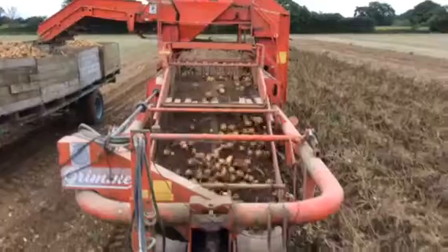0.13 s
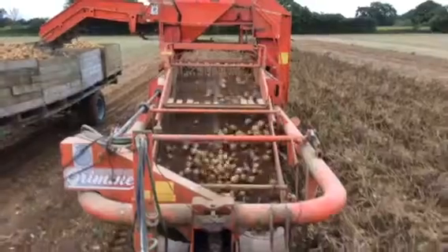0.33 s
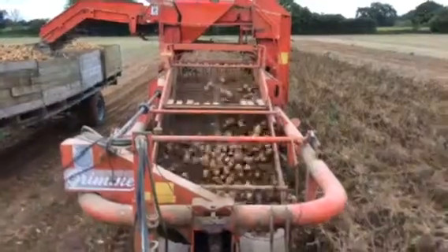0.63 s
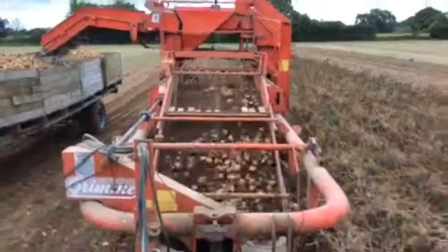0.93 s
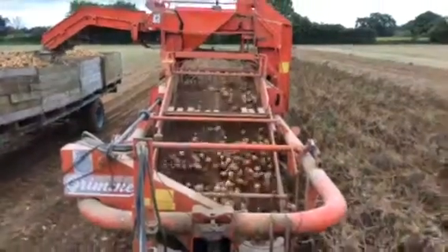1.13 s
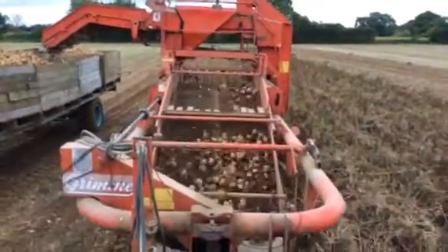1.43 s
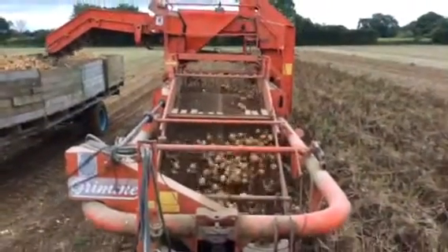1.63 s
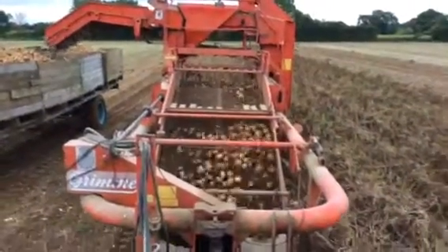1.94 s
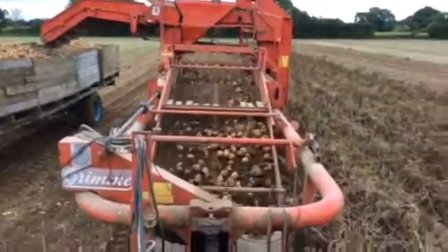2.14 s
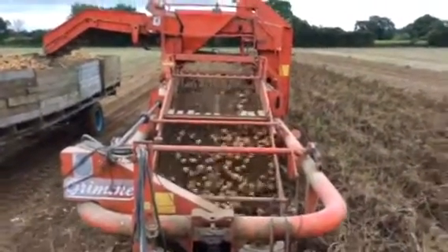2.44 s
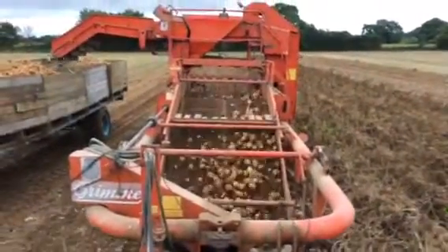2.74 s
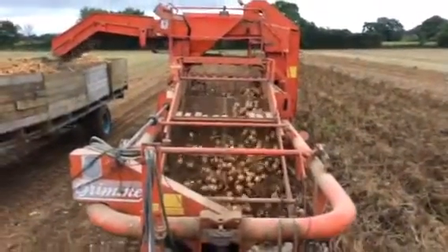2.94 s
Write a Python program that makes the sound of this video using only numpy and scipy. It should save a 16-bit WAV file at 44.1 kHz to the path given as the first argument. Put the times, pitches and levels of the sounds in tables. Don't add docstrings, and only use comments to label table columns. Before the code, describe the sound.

Potato harvester working in an open field, close and dry. Silence until 0.12 s, then full roar cuts in and continues to the end. A diesel drone near 85 Hz throbs with small load surges, strongest around 0.8 and 1.1-1.3 s, under a wavering whine near 1.5 kHz. Hissy rod rattle carries hollow potato clacks, sharp knocks, brief rubs and tiny high squeaks, busiest at 2.05-2.2 and 2.6-2.85 s.

```python
import sys
import numpy as np
from scipy import signal
from scipy.fft import rfft, irfft
from scipy.io import wavfile
from scipy.ndimage import uniform_filter1d

SR = 44100
rng = np.random.default_rng(int(sys.argv[2]) if len(sys.argv) > 2 else 0)


def gain_from_decibels(decibels):
    exponent = np.asarray(decibels, float) / 20
    return 10 ** exponent


def master(y):
    cut = np.clip(np.atleast_2d(y).T, -1, 1)
    pcm = np.round(cut * 32767)
    wavfile.write(sys.argv[1], SR, pcm.astype(np.int16))


N = 136269

# time in seconds, firing rate in Hz, firing line level in dB.
ENGINE = [
    (0, 85.5, -31),
    (.5, 85.8, -30),
    (1.1, 85.3, -31),
    (1.4, 85.6, -28),
    (1.9, 85.7, -29),
    (2.25, 86.2, -31),
    (2.6, 85.4, -29),
    (3.1, 86, -31),
]


def evened(x):
    return x / np.sqrt(np.mean(x ** 2) + 1e-20)


def curve(rows, col):
    return np.interp(np.arange(N) / SR, *np.transpose(rows)[[0, col]])


def wander(per_s):
    t = np.arange(0, N, 64) / SR
    f = np.geomspace(.3, per_s, num=24)[:, None]
    waves = np.sin(2 * np.pi * (f * t + rng.random(f.shape))) / np.sqrt(f)
    return np.interp(np.arange(N) / SR, t, evened(waves.sum(0)))


def colour(x, points):
    f, db = np.transpose(points)
    hz = np.fft.rfftfreq(len(x), 1 / SR)
    gain = gain_from_decibels(np.interp(np.log(hz + 1), np.log(f + 1), db))
    return evened(irfft(rfft(x) * gain, len(x)))


def resonate(x, hz, width_hz):
    turn = np.exp(2j * np.pi * np.cumsum(hz * np.ones(len(x))) / SR)
    r = np.exp(-np.pi * width_hz / SR)
    return 2 * (turn * signal.lfilter([1 - r], [1, -r], x / turn)).real


def resonate_twice(x, hz, width_hz):
    return resonate(resonate(x, hz, width_hz), hz, width_hz)


def short_peak(x):
    return np.sqrt(uniform_filter1d(x ** 2, size=130).max())


def add(mix, s, sound):
    part = mix[round(s * SR):][:len(sound)]
    part += sound[:len(part)]


def tone(hz, level_db, wander_db, fuzz, width_hz):
    cycles = np.cumsum(hz * np.ones(N)) / SR + rng.random()
    clean = np.sqrt(2) * np.sin(2 * np.pi * cycles)
    blur = evened(resonate_twice(rng.standard_normal(N), hz, width_hz))
    return gain_from_decibels(level_db + wander_db * wander(9.8)) * (clean + fuzz * blur)


def swells(order):
    # time in seconds, swell in dB, order as a multiple of the firing rate.
    swell_rows = [(.14, 2.5, 1), (.3, -2, 1), (.26, 2.5, 2), (.545, 6.5, 1), (.61, 5, 2), (0.809, 13.5, 2),
                  (.975, 5, 2), (1.14, 10, 3), (1.2, 6, 1), (1.23, 12, 2), (1.27, -2, 1), (1.311, 3.5, 2),
                  (1.37, 7, 2), (1.42, 2, 1), (1.48, 2, 1), (1.525, 8, 2), (1.64, 2, 1), (1.695, 2, 1),
                  (1.79, 3.5, 3), (1.9, -1, 1), (1.97, -1, 1), (2.11, 3, 1), (2.2, 6, 2), (2.48, 3, 1),
                  (2.59, 5, 1), (2.64, 6, 2), (2.72, 10, 2), (2.97, 4, 1), (3.041, 5, 3)]
    swell_s = .018
    t = np.arange(0, N, 64) / SR
    swell_db = 0 * t
    for s, db, k in swell_rows:
        if round(k) == order:
            swell_db = swell_db + db * np.exp(-.5 * ((t - s) / swell_s) ** 2)
    return np.interp(np.arange(N) / SR, t, swell_db)


def engines():
    # multiple of the firing rate, level re firing line in dB.
    exhaust_orders = [(1, -1.5), (2, -8), (3, -10.5), (6, -19.5), (1.5, -33), (.5, -26)]
    # frequency in Hz, level in dB.
    far_hums = [(68.2, -38.5), (136, -43), (272, -45), (344.1, -39.5), (363, -45), (565, -50)]
    firing_hz, firing_db = curve(ENGINE, col=1), curve(ENGINE, col=2)
    mix = np.zeros(N)
    for k, order_db in exhaust_orders:
        wander_db = 1.5 if k != 1 else .8
        mix += tone(k * firing_hz, firing_db + order_db + swells(k), wander_db, .3 * k, 5 * k)
    for hz, level_db in far_hums:
        mix += tone(hz, level_db, 1.5, min(hz / 200, .8), 22)
    return mix


def gearbox():
    # time in seconds, frequency in Hz, level in dB.
    whine = [(0, 1477, -31), (.25, 1477, -31.5), (.44, 1476, -33), (.65, 1476, -30), (1.02, 1476, -32),
             (1.12, 1475, -39), (1.22, 1474, -38), (1.28, 1474, -30), (1.55, 1475, -33),
             (1.75, 1476, -31.5), (1.93, 1476, -35), (2.0, 1474, -30), (2.28, 1473, -30.5),
             (2.4, 1473, -35), (2.55, 1475, -30), (2.66, 1475, -34), (2.75, 1475, -30.5), (3.1, 1476, -31)]
    # share of the whine pitch, level re mean whine in dB.
    side_orders = [(.802, -12), (1.203, -16), (.4955, -13.5), (.69, -14), (.893, -15), (.936, -12),
                   (.524, -13), (.852, -12)]
    # time in seconds, frequency in Hz, level in dB.
    web_drive = [(.1, 1110, -36), (.22, 1165, -41), (.37, 1190, -36.5), (.44, 1125, -44), (.5, 1188, -37),
                 (.59, 1130, -34), (.66, 1165, -39), (.83, 1175, -35), (1.21, 1178, -38), (1.45, 1170, -48),
                 (1.88, 1136, -35), (2.16, 1174, -33), (2.27, 1173, -43), (2.36, 1133, -39),
                 (2.63, 1180, -39), (2.75, 1155, -34), (2.85, 1191, -40), (3.1, 1188, -33)]
    trim_db = -2
    hz, level_db = curve(whine, col=1), curve(whine, col=2) + trim_db
    mix = tone(curve(web_drive, col=1), curve(web_drive, col=2) + trim_db, 1.5, .7, 40)
    mix += tone(hz, level_db, 1, .45, 35)
    for share, order_db in side_orders:
        mix += tone(share * hz, level_db.mean() + order_db, 2, .8, 16)
    return mix


def patchy_noise(patch_db):
    frames = N // 256 + 5
    a, b, patches = rng.standard_normal((frames, 513, 3)).T
    patches = uniform_filter1d(patches, size=8, axis=0)
    patches = evened(uniform_filter1d(patches, size=10, axis=1))
    spectra = (a + 1j * b) * gain_from_decibels(patch_db * patches)
    return signal.istft(spectra, nperseg=1024, noverlap=768)[1][:N]


def roar():
    # frequency in Hz, density in dB per Hz.
    roar_shape = [(22, -29), (45, -6), (90, -7), (260, -5.5), (600, -9.5), (1400, -8.5), (1960, -16),
                  (3200, -26)]
    # frequency in Hz, width in Hz, level in dB.
    panel_modes = [(131, 54, -39), (159.4, 72, -43.5), (180, 124, -37.5), (934, 170, -49.5),
                   (1140, 190, -42.5), (1240, 110, -51), (1630, 500, -42.5), (2630, 600, -46),
                   (5880, 1700, -46)]
    roar_db, firing_gate = -25.5, .05
    frame_share, frame_top_hz = .4, 300
    firing_cycles = np.cumsum(curve(ENGINE, col=1)) / SR
    noise = patchy_noise(patch_db=1.1) * (1 + firing_gate * np.cos(2 * np.pi * firing_cycles))
    both = gain_from_decibels(roar_db) * colour(noise, [(6, -60)] + roar_shape + [(4200, -74)])
    for hz, width_hz, level_db in panel_modes:
        both += gain_from_decibels(level_db) * evened(resonate_twice(noise, hz, width_hz))
    frame = signal.filtfilt(*signal.butter(2, frame_top_hz, fs=SR), both)
    shake = gain_from_decibels(frame_share * (swells(order=1) + swells(order=2)))
    return both + frame * (evened(shake) - 1)


def grains(ticks, decay_s):
    t = np.arange(400) / SR
    return signal.oaconvolve(ticks, np.exp(-t / decay_s))[:N] * rng.standard_normal(N)


def rattle():
    # frequency in Hz, density in dB per Hz.
    rattle_shape = [(1180, -35), (2000, -3.5), (2740, -6.5), (3200, -7.5), (13900, -18), (15600, -23),
                    (16000, -47)]
    # time in seconds, level in dB.
    crop_load = [(.1, 2), (.35, -1), (.5, -0.5), (.7, 1), (.85, 0.5), (1.0, 1), (1.2, -1), (1.45, -0.5),
                 (1.6, -1.5), (1.85, -1.5), (2.1, -0.5), (2.3, 0), (2.45, -2.5), (2.55, -1.5), (2.72, 0.5),
                 (2.8, 0), (3.1, 1.5)]
    rattle_db, hiss_db, stray_db = -38.5, -35.5, -50.5
    rattles_per_s, strays_per_s, spread_db = 1300, 58, 3.5
    surge_db, load_share = 1, .94
    shape = [(800, -46)] + rattle_shape
    tick_db = spread_db * np.minimum(rng.exponential(1, N), 5)
    ticks = gain_from_decibels(tick_db) * (rng.random(N) < rattles_per_s / SR)
    strays = rng.exponential(1, N) * (rng.random(N) < strays_per_s / SR)
    both = gain_from_decibels(rattle_db) * colour(grains(ticks, decay_s=.0017), shape)
    both += gain_from_decibels(hiss_db) * colour(rng.standard_normal(N), shape)
    both += gain_from_decibels(stray_db) * colour(grains(strays, decay_s=.0023), shape)
    load_db = curve(crop_load, col=1)
    return both * gain_from_decibels(surge_db * wander(24.73) + load_share * (load_db - load_db.mean()))


def clack(start, peak_db, hz):
    trim_db, width_hz, t60_s = -7.5, 220, .063
    t = np.arange(2000) / SR
    ring = resonate(rng.standard_normal(2000) * gain_from_decibels(-60 * t / t60_s), hz, width_hz)
    return start, gain_from_decibels(peak_db + trim_db) * ring / abs(ring).max()


def knock(start, peak_db, hz):
    trim_db, crack_db, core_width_hz = -6.5, 9, 4100
    t60_s, tick_share, tick_s, rise_s = .2, .9, .0015, .00025
    t = np.arange(4000) / SR
    envelope = (gain_from_decibels(-60 * t / t60_s) + tick_share * np.exp(-t / tick_s)) * np.minimum(t / rise_s, 1)
    burst = rng.standard_normal(4000) * envelope
    crack = signal.lfilter(*signal.butter(2, [2500, 8000], "band", fs=SR), burst)
    both = gain_from_decibels(crack_db) * evened(crack) + evened(resonate(burst, hz, core_width_hz))
    return start, gain_from_decibels(peak_db + trim_db) * both / short_peak(both)


def squeak(start, peak_db, hz):
    trim_db, rise_s, hold_s, t60_s, slips_per_s = -2.5, .00041, .0042, .073, 1100
    ring_hz, skirt_hz, skirt_up_hz, skirt_db = 200, 2200, 900, -1.5
    t = np.arange(4000) / SR
    push = np.minimum(t / rise_s, 1) * gain_from_decibels(-60 * np.maximum(t - hold_s, 0) / t60_s)
    kicks = rng.exponential(1, 4000) * (rng.random(4000) < slips_per_s / SR)
    slips = push * (.84 + 3 * kicks) * rng.standard_normal(4000)
    mode = resonate(resonate(slips, hz, ring_hz), hz, 4 * ring_hz)
    skirt = resonate_twice(slips, hz + skirt_up_hz, skirt_hz)
    ring = evened(mode) + gain_from_decibels(skirt_db) * evened(skirt)
    return start, gain_from_decibels(peak_db + trim_db) * ring / short_peak(ring)


def rub(start, length_s, level_db, hz, width_hz):
    n = round(length_s * SR)
    grip = gain_from_decibels(1.6 * rng.standard_normal(80).repeat(100)[:n])
    grit = rng.standard_normal(8000)[:n] * grip
    swell = np.sqrt(2 * np.hanning(n))
    return start, gain_from_decibels(level_db) * swell * evened(resonate_twice(grit, hz, width_hz))


def scene():
    # start in seconds, peak in dB, ring in Hz.
    clack_rows = [(0.1249, -30, 2160), (0.1942, -16, 2120), (0.2521, -29, 2550), (0.278, -23, 1970),
                  (0.6851, -29, 2300), (0.7225, -23, 2380), (0.8103, -27, 2310), (1.0148, -29, 2150),
                  (1.0635, -22, 1940), (1.155, -22, 2090), (1.3885, -23, 2320), (1.5107, -25, 2120),
                  (1.5515, -30, 2040), (1.5746, -34, 2110), (1.7362, -25, 2510), (1.9447, -20, 1950),
                  (2.1109, -19, 1930), (2.1314, -17, 2110), (2.1787, -28, 2127), (2.2685, -19, 2700),
                  (2.3096, -28, 2460), (2.6571, -18, 2090), (2.71, -14, 2000), (2.8422, -16, 1970),
                  (2.8816, -27, 2500), (2.925, -21, 1950), (2.974, -28, 2600), (3.0622, -16, 2150)]
    # start in seconds, peak in dB, core colour in Hz.
    knock_rows = [(0.127, -25, 3970), (0.2, -24, 3510), (0.3087, -26, 4700), (0.4765, -24, 3670),
                  (0.623, -25, 5990), (0.8094, -23.5, 4000), (0.857, -25, 6200), (0.9394, -26, 5340),
                  (1.0894, -25, 3730), (1.705, -24, 4170), (1.73, -27, 4135), (1.8376, -24, 3640),
                  (2.0625, -24, 4074), (2.3863, -26, 4340), (2.426, -19, 7150), (2.549, -29, 3300),
                  (2.614, -26, 3360), (2.656, -21.5, 5300), (2.6818, -25, 5780), (2.7129, -20, 5500),
                  (2.78, -33, 3790), (2.8334, -24, 3720)]
    # start in seconds, peak in dB, ring in Hz.
    squeak_rows = [(0.154, -26, 13300), (0.2453, -25, 13600), (0.2537, -25, 13300), (0.2674, -45, 13600),
                   (0.4334, -40, 12800), (0.6734, -46, 12700), (0.7173, -35, 12500), (0.909, -32, 13050),
                   (0.9807, -42, 13600), (1.072, -33, 12630), (1.254, -29, 13600), (1.519, -26, 13100),
                   (1.6347, -36, 14100), (2.0517, -32, 13500), (2.174, -34, 13300), (2.2593, -36, 13500),
                   (2.633, -29, 13500),
                   (0.159, -35, 10800), (0.4334, -28, 11100), (0.667, -24, 10800), (0.7228, -30, 10850),
                   (0.9773, -27, 10800), (1.3399, -35, 10050), (1.6212, -26.5, 10900), (1.804, -28, 10700),
                   (2.0522, -32, 11100), (2.072, -26.5, 10950), (2.16, -31, 10600), (2.1794, -32, 11700),
                   (2.64, -29, 11000), (2.6516, -27.5, 10970), (2.9103, -33, 10480),
                   (0.9153, -32, 9000), (0.9383, -33, 9010), (1.427, -29.5, 8900), (1.8384, -32, 8960),
                   (1.8899, -33, 8800), (2.0742, -26.5, 8830), (2.9524, -26, 8830),
                   (0.161, -38, 14900), (0.2379, -31, 15200), (0.2583, -31, 14600), (1.6352, -37, 15100),
                   (2.0023, -40, 15220), (2.0453, -31, 15400), (2.2263, -32, 14900), (2.2593, -38, 15200),
                   (2.5287, -38, 14900)]
    # start in seconds, length in seconds, level in dB, centre in Hz, width in Hz.
    rub_rows = [(1.272, 0.033, -41, 3170, 130), (2.65, 0.12, -39.5, 5700, 3400),
                (2.679, .02, -34.5, 5900, 800), (2.711, .028, -34.5, 5550, 500),
                (2.743, .014, -35.5, 5700, 500), (2.612, .022, -38, 3300, 500),
                (.197, .024, -35, 3700, 1500), (.478, .018, -38, 3700, 300), (2.5, .014, -40.5, 5800, 300),
                (1.62, 0.045, -40, 11500, 5000), (2.385, 0.07, -43, 8600, 4000)]
    mix = engines() + gearbox() + roar() + rattle()
    for row in clack_rows:
        add(mix, *clack(*row))
    for row in knock_rows:
        add(mix, *knock(*row))
    for row in squeak_rows:
        add(mix, *squeak(*row))
    for row in rub_rows:
        add(mix, *rub(*row))
    return mix[None]


def low_pass(x):
    return signal.sosfilt(signal.butter(12, 15400, fs=SR, output="sos"), x)


def record(dry):
    start_s, fade_s, edge_hz = .1203, .0002, 15325
    edge = signal.firwin(4001, edge_hz, window=("kaiser", 8), fs=SR)
    gate = np.clip((np.arange(N) / SR - start_s) / fade_s, 0, 1)
    return low_pass(signal.oaconvolve(dry, edge[None], "same") * gate)


dry = scene()
out = record(dry)
master(out)
```